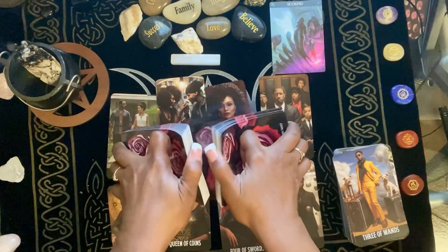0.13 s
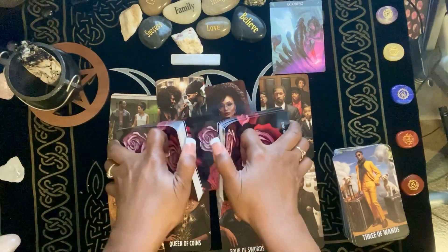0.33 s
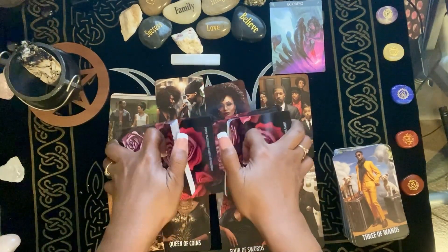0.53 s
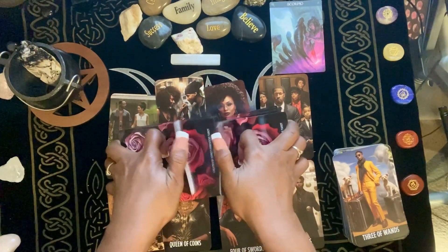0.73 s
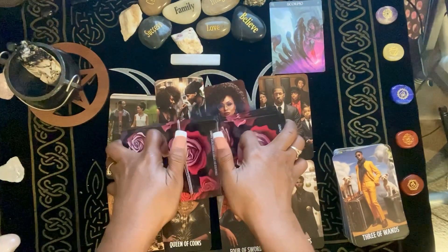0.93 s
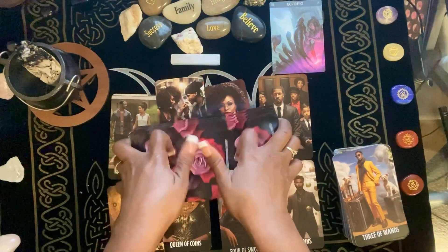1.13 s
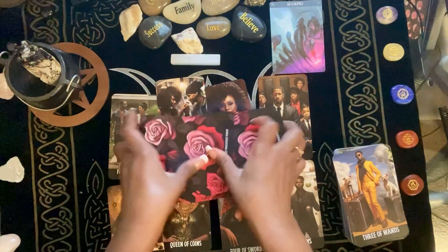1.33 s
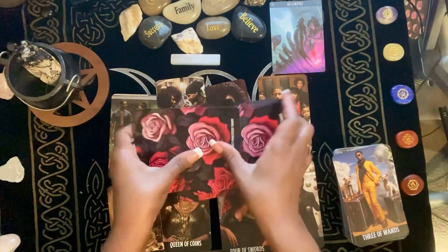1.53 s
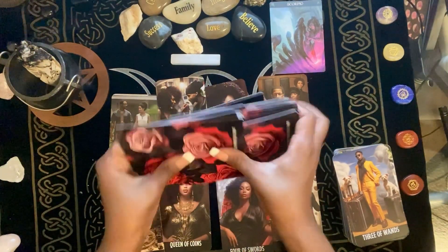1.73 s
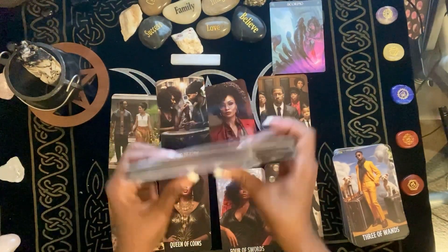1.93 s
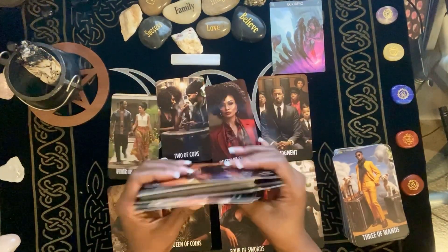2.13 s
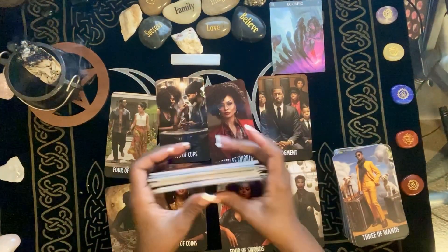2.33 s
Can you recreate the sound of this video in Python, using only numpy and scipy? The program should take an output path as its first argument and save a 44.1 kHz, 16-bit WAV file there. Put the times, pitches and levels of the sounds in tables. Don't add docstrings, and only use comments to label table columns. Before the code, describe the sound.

A card shuffle heard close up on a cloth-covered table: rapid dry flicks growing louder and then sparser, soft handling ticks, then a short burst of sliding and tapping cards, with faint room air and a small phone-like stereo microphone.

```python
import sys
import numpy as np
from scipy import signal
from scipy.fft import rfft, irfft
from scipy.io import wavfile
from scipy.ndimage import uniform_filter1d

SR = 44100
rng = np.random.default_rng(int(sys.argv[2]) if len(sys.argv) > 2 else 0)


def how_loud(loudness_db):
    steps = np.asarray(loudness_db, float) / 20
    return 10 ** steps


def int16_out(signal):
    q = np.round(np.clip(np.atleast_2d(signal).T, -1, 1) * 32767)
    wavfile.write(sys.argv[1], SR, q.astype(np.int16))


N = 110250

# f/Hz, density/dB
AIR_SPECTRUM = [(25, -9), (45, -0.5), (90, -6.5), (135, 0.5), (250, -8.5), (500, -16), (1500, -18.5),
                (15000, -62.5)]
# t/s, level/dB
RUB_LEVEL = [(0, -87), (.07, -70.5), (1.0, -73.5), (1.1, -75), (1.25, -73.5), (1.27, -78.5), (1.315, -85),
             (1.345, -65), (1.49, -75.5), (1.53, -66), (1.595, -70), (1.66, -60), (1.75, -78), (1.8, -57),
             (1.9, -59.5), (1.94, -65), (2.1, -65), (2.3, -64), (2.4, -81), (2.5, -74.5)]
# f/Hz, density/dB
RUB_SPECTRUM = [(300, -3), (1200, -2), (2000, 3), (3500, -3), (9000, -7), (15000, -13)]
# t/s, slap peak/dB, snap/dB, slap f/Hz, length/ms
RIFFLE_CARDS = [(0.0327, -31, -37.5, 740, 2.8), (0.0668, -28, -23.5, 1300, 10.4),
                (0.077, -20, -46, 1940, 3.2), (0.093, -15.5, -16.5, 1770, 3.8),
                (0.0995, -24.5, -50, 1390, 3.4), (0.1075, -33, -17, 975, 1.3),
                (0.122, -28.5, -25, 990, 6.8), (0.1443, -9, -14.5, 1506, 6.1), (0.153, -25, -36, 1980, 5),
                (0.161, -23.5, -37, 784, 3.2), (0.1676, -10, -20.5, 1700, 4.4),
                (0.1745, -37, -14, 1530, 1.9), (0.180, -20, -21, 900, 1.4), (0.2499, -21.5, -16, 1210, 2.7),
                (0.258, -17, -19.5, 1630, 1.4), (0.269, -11.5, -14, 1800, 6.4),
                (0.2755, -14.5, -17, 1700, 2.8), (0.291, -25, -17.5, 1220.0, 1.5),
                (0.3072, -9, -8, 1425, 3.58), (0.3285, -29, -33, 1970, 0.95),
                (0.3478, -23, -43.5, 880, 0.44), (0.3635, -15, -3.5, 1500, 2.6),
                (0.3913, -9, -10, 1090, 0.85), (0.4083, -7, -6.5, 1204, 3), (0.4162, -7, -1, 1350, 2.42),
                (0.4251, -4, -9.5, 1065, 1.85),
                (0.51, -38, -39, 885, 10), (0.5182, -25.5, -33.5, 900, 2.9),
              (0.5316, -10.5, -14.5, 1130, 2.61), (0.5773, -58, -34, 1020, 2.7),
              (0.6156, -29, -34.5, 890, 7.5), (0.6288, -22, -25, 970.0, 4.4),
              (0.6344, -6.5, -20.5, 1120, 1.17), (0.645, -9, -18.5, 940, 3.12),
              (0.7405, -25, -24, 910, 8.8), (0.758, -4, -9.5, 1320, 4.4), (0.7732, -10, -5, 2070, 5),
              (0.7771, -7.5, -8.5, 1990, 3.16), (0.7815, -12, -15, 2060, 2), (0.788, -27, -44, 2010, 4),
              (0.857, -28.5, -20.5, 930, 3.5), (0.8732, -8, -11.5, 910, 4.04),
              (0.9254, -18.5, -15, 1500, 2.54), (0.9414, -19.5, -12, 1330, 0.47),
              (0.964, -21.5, -22.5, 960, 8.7), (0.9733, -21, -17, 1340, 3), (0.9818, -13, -13, 1015, 1.9),
              (1.0033, -18.5, -16, 1460.0, 3.5), (1.0186, -11, -8.5, 850, 4.2),
              (1.0305, -15, -17.5, 1730, 2.56)]
# f/Hz, density/dB
RIFFLE_SNAP = [(500, -19), (1800, -3.5), (3000, -2.5), (4500, -4), (6500, -5.5), (9000, -6), (13000, -14),
               (16000, -12.5)]
# f/Hz, level/dB, t60/s
TABLE_MODES = [(52, -35, .2), (78, -37, .12), (124, -31, .2), (250, -33, .06), (320, -26, .05),
               (400, -21, .08), (500, -22, .05)]
# t/s, slap peak/dB, snap/dB, slap f/Hz
EDGE_TICKS = [(1.117, -53, -47, 885), (1.188, -38, -37.5, 975), (1.333, -49.5, -50.5, 1580),
              (1.397, -34, -35.5, 1940), (1.425, -29, -41, 1850), (1.519, -28, -54, 2090),
              (1.536, -27.5, -32.5, 950), (1.631, -18, -26, 2000), (1.645, -49, -53, 2320),
              (1.654, -36, -52, 2020), (1.707, -43, -75, 1730), (1.865, -30, -50, 2200),
              (1.879, -57, -44.5, 1950), (2.417, -49, -48, 1230)]
# f/Hz, density/dB
EDGE_SNAP = [(500, -29), (1800, 1), (3000, 2.5), (4500, 2), (6500, -7), (9000, -7.5), (13000, -16.5),
             (16000, -12)]
# t/s, level/dB
SLIDE_LEVEL = [
    (2.115, -72),
    (2.13, -45),
    (2.175, -24.5),
    (2.215, -35),
    (2.25, -41),
    (2.36, -53),
]
# f/Hz, density/dB
SLIDE_SPECTRUM = [(200, -8), (500, -6), (1800, -5.5), (5000, -11), (15000, -62)]
# t/s, slap peak/dB, snap/dB, slap f/Hz, length/ms
SQUARING_KNOCKS = [(2.116, -27.5, -32.5, 1750, 8.7), (2.124, -25, -23.5, 820, 3.2),
                   (2.127, -26.5, -48, 272, 4), (2.129, -23.5, -28.5, 716, 10),
                   (2.1495, -13, -17.5, 1840, 3.1), (2.162, -32, -23, 1510, 5),
                   (2.166, -22.5, -35, 298, 5.5), (2.170, -22, -14.5, 720, 5.4),
                   (2.1762, -12.5, -8, 1630, 0.73), (2.191, -30, -26, 1270, 5),
                   (2.195, -9.5, -26.5, 2700, 3), (2.200, -25, -23, 293, 2.9),
                   (2.210, -15, -19, 2200, 3.38), (2.248, -24, -44.5, 1730, 5.5),
                   (2.256, -20.5, -23, 2180, 3.64), (2.288, -18, -23, 1580, 3.99)]
# f/Hz, level/dB, t60/s
PACK_MODES = [(55, -28, .15), (129, -26, .16), (230, -18, .07), (265, -13, .08), (295, -10, .11),
              (404, -18, .07)]
# f/Hz, phase/rad
PORT_PHASE = [(0, 0), (1600, -.7), (2400, -2.3), (5600, -3.9), (6900, -7.3), (10000, -3.5), (10900, -2.8),
              (12600, -.2), (14900, 3.1)]


def rms_one(x):
    return x / np.sqrt(np.mean(x ** 2) + 1e-20)


def colour(x, points):
    hz, db = np.transpose(points)
    f = np.maximum(np.fft.rfftfreq(x.shape[-1], 1 / SR), 10)
    gain = how_loud(np.interp(np.log(f), np.log(hz), db, left=-70))
    return irfft(rfft(x) * gain, x.shape[-1])


def curve(rows):
    s, db = np.transpose(rows)
    return how_loud(np.interp(np.arange(N) / SR, s, db, left=-120, right=-120))


def drift(rate_hz):
    r = np.exp(-2 * np.pi * rate_hz / SR)
    noise = rng.standard_normal(N + SR)
    return rms_one(signal.lfilter([1], [1, -2 * r, r * r], noise)[SR:])


def ring(x, hz, t60_s):
    r, w = how_loud(-60 / (t60_s * SR)), 2 * np.pi * hz / SR
    return signal.lfilter([0, np.sin(w)], [1, -2 * r * np.cos(w), r * r], x + 1e-18)


def air():
    mid, side = colour(rng.standard_normal((2, N)), AIR_SPECTRUM)
    level = how_loud(-54.5 + 0.5 * drift(53))
    return level * rms_one(mid + 0.46 * side * [[1], [-1]])


def friction(rows, points, grains_per_s, grain_db, patchy_db, channels):
    shape = (channels, N)
    struck = rng.random(shape) < grains_per_s / SR
    size = how_loud(grain_db * np.minimum(rng.exponential(1, shape), 4))
    grains = struck * size * rng.standard_normal(shape)
    return rms_one(colour(grains, points)) * curve(rows) * how_loud(patchy_db * drift(55))


def trapped_air_slap(noise, shape, hold_s, hz, taut):
    rise, cycles, overtone, low_share = .4, 6.5, 2, 0.27
    drive = 0.47 * noise * shape * np.clip(hold_s * 1000 - 2, .1, 3) / 6
    drive[int(rise * hold_s * SR)] -= 1
    t60_s = taut * cycles / hz
    slap = ring(drive, hz, t60_s) - how_loud(-6) * ring(drive, hz * overtone, t60_s / overtone)
    return signal.lfilter([1, -1], [1, -np.exp(-2 * np.pi * low_share * hz / SR)], slap)


def cards(rows, body, snap, snap_db, body_db):
    size = 4096
    rise, crack_s = .4, 0.0004
    lead_db, lead_s, lead_n = -18.5, 0.0019, 500
    flap_db, flap_bright_db, flap_t60_s, flap_cycles, flap_alike = -12, -10, 0.05, 3.5, 0.81
    sides = np.array([[1], [-1]])
    t, f = np.arange(size) / SR, np.fft.rfftfreq(size, 1 / SR)
    slaps, snaps = np.zeros((2, 2, N + size))
    pushes = np.zeros((len(body), 2, N + size))
    noise = rng.standard_normal((len(rows), 8, size))
    for (s, slap_db, bright_db, hz, ms), (a, b, *c) in zip(rows, noise):
        i, hold_s = int(s * SR), max(ms, .5) / 1000
        slap_gain, snap_gain = how_loud(slap_db), how_loud(bright_db + snap_db)
        shape = (1 - np.exp(-(t / (rise * hold_s)) ** 2)) * np.exp(-(t / hold_s) ** 2)
        taut = 1 + 1.4 / (1 + (1800 / hz) ** 12)
        place = np.exp(1j * np.pi * f * 54.6e-6 * a[0] * sides)

        grain_db = 3 * rms_one(uniform_filter1d(a, size=90))
        flap = how_loud(flap_db - 60 * t / flap_t60_s + grain_db) * (1 - np.exp(-t / hold_s))
        low = flap_alike * c[0] + np.array(c[1:3])
        high = flap_alike * c[3] + np.array(c[4:6])

        drag = high[:, -lead_n:] * np.exp(-t[:lead_n] / lead_s)[::-1]
        snaps[:, i - lead_n:i] += snap_gain * how_loud(lead_db) * drag
        crack = 1 + 0.53 * np.exp(-((t - rise * hold_s) / crack_s) ** 2)
        burst = irfft(rfft(b * shape * crack) * place)
        snaps[:, i:i + size] += snap_gain * (burst + high * flap * how_loud(flap_bright_db))

        slap = trapped_air_slap(a, shape, hold_s, hz, taut)
        placed = irfft(rfft(slap) * place) / np.abs(slap).max()
        low_flap = rms_one(ring(np.gradient(low, axis=1), hz, taut * flap_cycles / hz)) * flap
        slaps[:, i:i + size] += slap_gain * (placed + low_flap)

        mode_pan = 1 + 0.52 * a[-len(body):, None, None] * sides
        mode_gain = how_loud(slap_db + body_db + 3 * b[-len(body):, None, None])
        pushes[:, :, i:i + 40] += mode_pan * mode_gain * np.hanning(40) / 20
    unit = np.sqrt(np.mean(colour(rng.standard_normal(N), snap) ** 2))
    thud = sum(how_loud(db) * ring(push, hz, t60_s) for push, (hz, db, t60_s) in zip(pushes, body))
    return (slaps + thud)[:, :N] + colour(snaps[:, :N], snap) / unit


def room(x):
    t60_s, dull_hz, start_s = 0.19, 5140, 0.00033
    t = np.arange(SR // 2) / SR
    noise = rng.standard_normal((2, len(t)))
    dull = signal.sosfilt(signal.butter(1, dull_hz / 2, fs=SR, output="sos"), noise)
    bright = 0.35 * (noise - dull) * how_loud(-60 * t / (1.17 * t60_s))
    tail = (dull * how_loud(-60 * t / t60_s) + bright) * (1 - np.exp(-t / start_s))
    tail /= np.sqrt(np.sum(tail ** 2, axis=1, keepdims=True))
    return how_loud(-11.5) * signal.fftconvolve(x[None], tail, axes=1)[:, :N]


def scene():
    rub = how_loud(12.5) * friction(RUB_LEVEL, RUB_SPECTRUM, 9000.0, grain_db=-0.5, patchy_db=2.2, channels=2)
    riffle = cards(RIFFLE_CARDS, TABLE_MODES, RIFFLE_SNAP, snap_db=-2.5, body_db=-1.5)
    timed_ticks = [(*row, 2.77) for row in EDGE_TICKS]
    ticks = cards(timed_ticks, TABLE_MODES, EDGE_SNAP, snap_db=8.5, body_db=-13)
    slide = friction(SLIDE_LEVEL, SLIDE_SPECTRUM, 4400.0, grain_db=1.5, patchy_db=3, channels=1)
    knocks = cards(SQUARING_KNOCKS, PACK_MODES, EDGE_SNAP, snap_db=4.0, body_db=-10.5)
    near = riffle + ticks + slide + knocks
    return near + room(near[1]) + rub + air()


def roll_off(x):
    return signal.sosfilt(signal.butter(12, 16480, fs=SR, output="sos"), x)


def record(dry):
    top, shared, shared_above_hz, left_db = 1.0, .97, 7300, .4
    low_cut_hz, roll_hz, cutoff_hz = 29, 16300, 16400
    left, right = rfft(top * np.tanh(dry / top))
    f = np.maximum(np.fft.rfftfreq(N, 1 / SR), 1)
    share = shared / (1 + (shared_above_hz / f) ** 24)
    left = share * right + np.sqrt(1 - share ** 2) * left
    left = left * how_loud(left_db) * np.exp(1j * np.interp(f, *np.transpose(PORT_PHASE)))
    band = (f < cutoff_hz) / (1 + (low_cut_hz / f) ** 4 + (f / roll_hz) ** 20)
    mix = irfft(np.array([left, right]) * band, N)
    return roll_off(mix)


dry = scene()
out = record(dry)
int16_out(out)
```